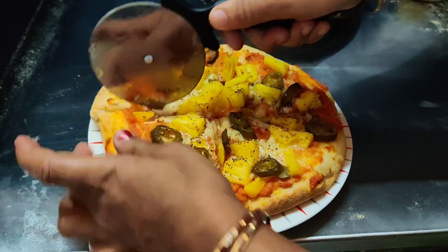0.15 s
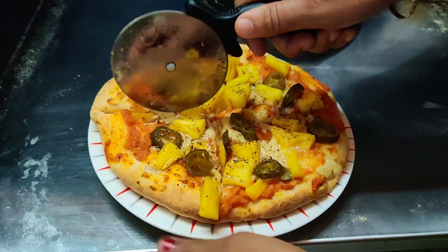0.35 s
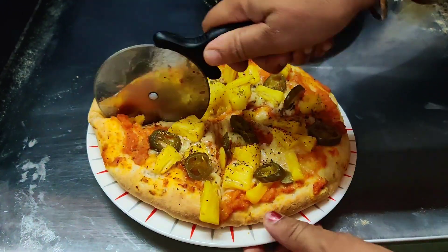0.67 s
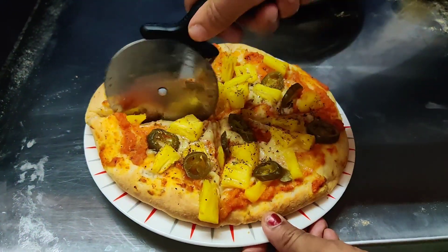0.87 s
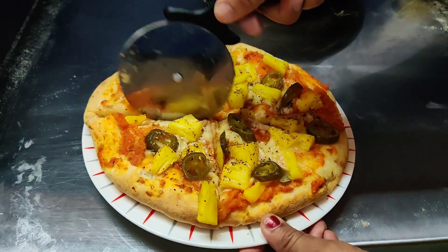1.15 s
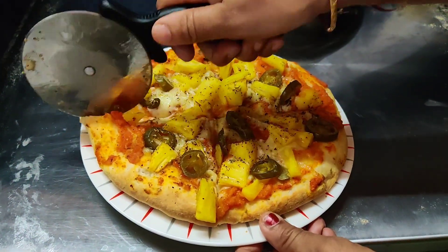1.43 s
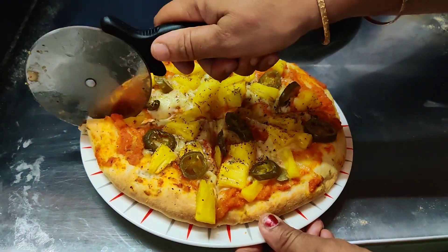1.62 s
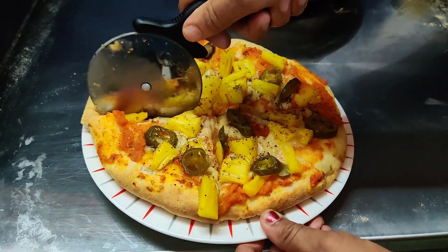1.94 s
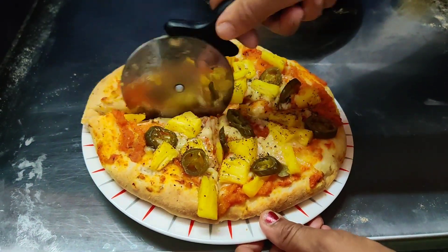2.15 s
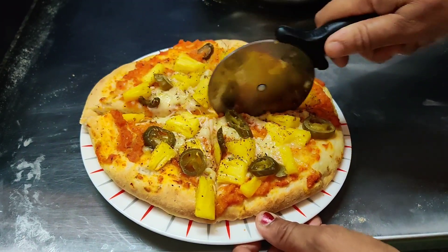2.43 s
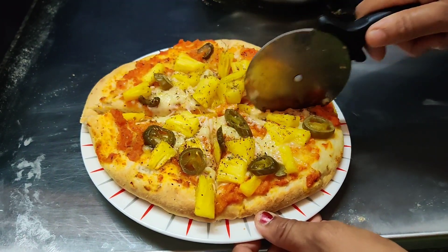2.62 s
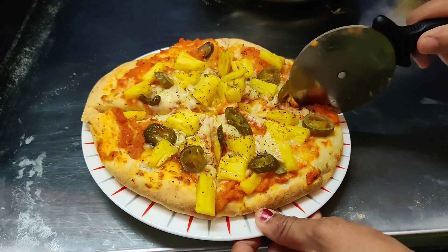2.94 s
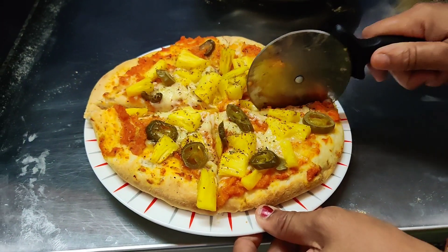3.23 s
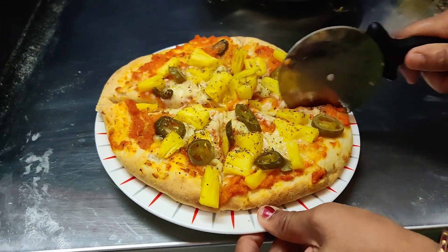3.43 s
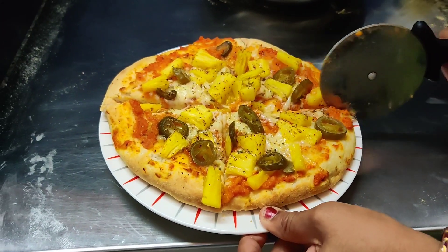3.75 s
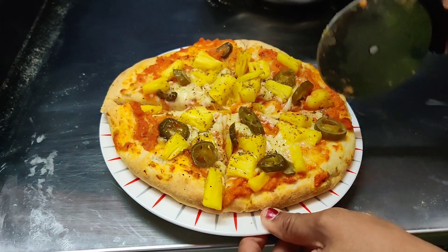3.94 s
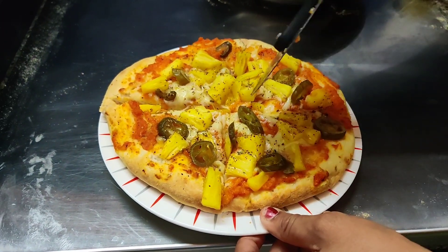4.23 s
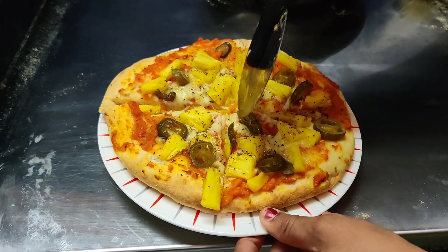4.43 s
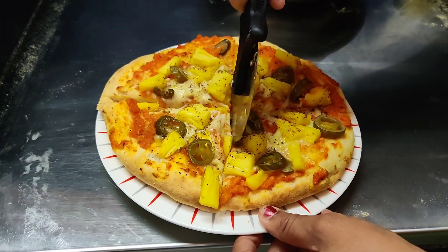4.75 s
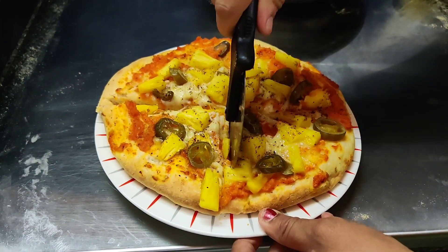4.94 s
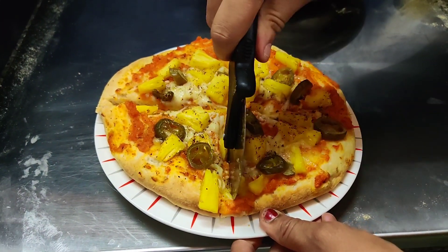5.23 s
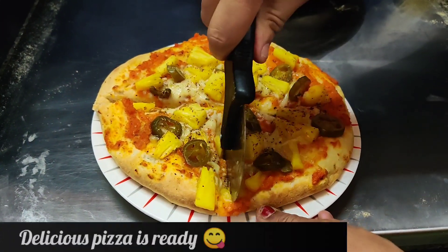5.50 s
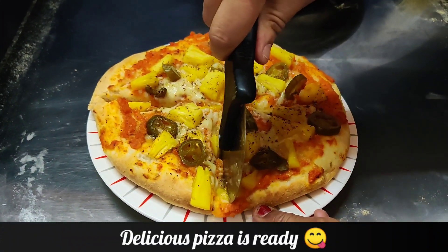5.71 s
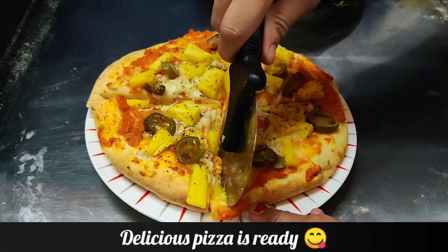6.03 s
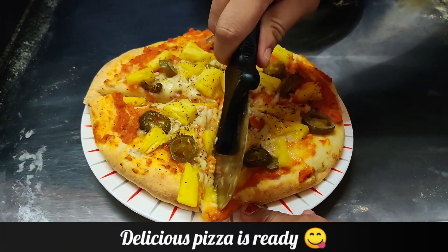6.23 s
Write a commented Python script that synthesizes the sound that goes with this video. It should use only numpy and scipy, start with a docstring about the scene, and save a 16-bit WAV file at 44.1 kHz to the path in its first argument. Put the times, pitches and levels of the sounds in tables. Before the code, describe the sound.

A cutting wheel crunches lightly through crisp pizza crust, knocking a ceramic plate with sharp clacks and a brief scrape in a humming, echoing kitchen.

```python
"""Cutting a pizza on a plate

A steel cutting wheel works through a pizza crust and knocks on the plate below, close to a stereo microphone.
Knocks are sums of decaying plate modes; crumbs snap as filtered noise bursts and crackle as sparse clicks.
The plate drags on the counter, the wheel skids on the glaze, and the hard kitchen echoes them by random taps.
A fan hums as wandering tones in room noise, under two insects of narrow-band noise and a small chirping bird.
"""
import sys
import numpy as np
from scipy import signal
from scipy.fft import rfft, irfft
from scipy.io import wavfile
from scipy.ndimage import uniform_filter1d, minimum_filter1d

SR = 44100
rng = np.random.default_rng(int(sys.argv[2]) if len(sys.argv) > 2 else 0)


def log_audio(samples):
    """Write samples as a 16-bit WAV file to the path given in sys.argv[1]."""
    # one column per channel
    frames = np.atleast_2d(samples).T
    # limit to full scale, then quantise
    limited = np.clip(frames, -1, 1)
    pcm = np.round(limited * 32767).astype(np.int16)
    wavfile.write(sys.argv[1], SR, pcm)


def nominal_scale(level):
    """Amplitude ratio for a level in decibels (scalar or array-like)."""
    x = np.asarray(level, float) / 20
    return 10 ** x


N = 280917

# crust giving way under the wheel; the 19 ms row is one sharp bright tick:
# start_s, length_s, crackle_db, rise (share of the length)
CRUST_STROKES = [(0.212, 0.15, -79.5, .8), (0.639, 0.019, -61, 0.24), (1.04, 0.081, -75, .15),
                 (1.184, 0.21, -87, 0.89), (1.548, 0.12, -76.5, 0.16), (1.693, 0.373, -77, 0.047),
                 (1.834, 0.059, -76.5, 0.69), (2.08, .42, -78, .3), (2.68, .11, -79.5, 0.62),
                 (3.27, 0.091, -76.5, .2), (3.41, 0.21, -72.5, 0.313), (3.59, 0.16, -77.5, .1),
                 (3.99, .05, -93.5, .5), (4.286, 0.071, -84.5, 0.43), (4.755, 0.17, -81.5, 0.24),
                 (4.9, .14, -86.5, .5), (5.08, 0.066, -83.5, .6), (5.49, .05, -92.5, .5),
                 (5.56, .21, -79, .3), (5.99, .13, -83.5, .45), (6.23, .11, -77.5, 0.64)]


def evened(x):
    """Power normalisation: scales to rms 1."""
    return x / np.sqrt(np.mean(x ** 2) + 1e-20)


def read(points, hz):
    """Spectral interpolation: value of a table on a log-frequency axis."""
    f, value = np.transpose(points)
    return np.interp(np.log(hz + 1), np.log(f + 1), value)


def add(mix, start_s, sound):
    """Superposition: mixes a sound in at a given time."""
    part = mix[..., round(start_s * SR):][..., :sound.shape[-1]]
    part += sound[..., :part.shape[-1]]


def coloured(x, gain):
    """Linear filtering: multiplies the spectrum by a gain that is a function of Hz."""
    hz = np.fft.rfftfreq(x.shape[-1], 1 / SR)
    return irfft(rfft(x) * gain(hz), x.shape[-1])


def peak(hz, centre_hz, width_hz):
    """Resonance: gain of one smooth band, 1 at its centre."""
    return 1 / np.sqrt(1 + (2 * (hz - centre_hz) / width_hz) ** 4)


def envelope(rows, ends_db):
    """Amplitude modulation: each row runs from a start level through its own to an end level."""
    out = np.zeros(N)
    for start_s, length_s, level_db, rise in rows:
        u = np.arange(0, 1, 1 / (length_s * SR))
        shape_db = np.interp(u, [0, np.clip(rise, .01, .99), 1], [ends_db[0], 0, ends_db[1]])
        tapered = nominal_scale(level_db + shape_db) * signal.windows.tukey(len(u), .2)
        add(out, start_s, tapered)
    return out


def grains(per_s, spread_db, wide):
    """Shot noise: sparse clicks of random sign in two channels; a few are large."""
    present = rng.random(N) < per_s / SR
    size = nominal_scale(spread_db * np.minimum(rng.exponential(1, N), 4)) * present
    near, far = size * rng.standard_normal((2, N))
    return np.array([near + wide * far, near - wide * far])


def air():
    """Partly coherent noise: room noise and hums, near mono in the bass, unrelated in the treble."""
    # spectrum of the room noise: frequency_hz, density_db (per Hz, relative)
    noise_spectrum = [(12, -32), (20, -2), (54, -7.5), (184, -5), (315, -10), (446, -15.5), (804, -16),
                      (1270, -21.5), (2610, -23.5), (4110, -33.5), (5100, -30.5), (6660, -44.5),
                      (8470, -37.5), (9430, -54), (12000, -71), (15600, -99), (22000, -120)]
    # coherence of the two channels: frequency_hz, likeness (-1 to 1)
    likeness = [(60, 0.57), (150, 1), (380, 0.74), (950, -0.19), (2380, -0.3), (5980, 0.11), (15000, -0.03)]
    # balance: frequency_hz, left_minus_right_db
    balance = [(60, 3.5), (240, -1), (950, 2.0), (3770, 4), (15000, -5.5)]
    # narrow steady bands, the highest a far insect: centre_hz, width_hz, rms_db
    steady_bands = [(320.5, 34, -73.5), (2510, 230, -90.5), (5000, 460, -92.5), (8500, 500, -84)]
    hz = np.fft.rfftfreq(N, 1 / SR)
    left, other = rfft(rng.standard_normal((2, N)))
    same = np.clip(read(likeness, hz), -1, 1)
    right = same * left + np.sqrt(1 - same ** 2) * other
    pair = np.array([left, right]) * nominal_scale(np.outer([.5, -.5], read(balance, hz)))
    out = nominal_scale(-60.5) * evened(irfft(pair * nominal_scale(read(noise_spectrum, hz)), N))
    for centre_hz, width_hz, rms_db in steady_bands:
        out += nominal_scale(rms_db) * evened(irfft(pair * peak(hz, centre_hz, width_hz), N))
    return out


def slow_noise(row):
    """Low-pass noise: two running means leave a slow random drift of rms 1."""
    return evened(uniform_filter1d(uniform_filter1d(row, size=2500), size=2500))


def fan():
    """Frequency modulation: tones of the fan, each wandering in pitch and a little in strength."""
    # tones: frequency_hz, wander_hz (rms), level_db (mean amplitude level of the two channels)
    tones = [(49, 2, -74), (98.3, 4, -65), (127.5, 1.2, -66), (185.2, 4.5, -63)]
    phase_rad, side_db = np.array([[.15], [-.15]]), [[1.2], [-1.2]]  # left leads and is louder
    out = np.zeros((2, N))
    for hz, wander_hz, level_db in tones:
        drift, swell = (slow_noise(row) for row in rng.standard_normal((2, N)))
        turns = np.cumsum(hz + wander_hz * drift) / SR + rng.random()
        out += nominal_scale(level_db + 2.8 * swell) * np.sin(2 * np.pi * turns + phase_rad) * nominal_scale(side_db)
    return out


def insect():
    """Narrow-band noise: a nearer insect's fuzzy whistle starts quickly and sinks through each chirp."""
    # chirps: start_s, level_db (reached at 0.3 of the length)
    chirps = [(.05, -76), (.64, -75.5), (1.176, -76.5), (1.768, -84), (2.381, -76), (3.094, -78.5),
              (3.868, -76), (4.6, -76), (5.1, -82), (5.71, -76.5)]
    # chirp level at its start and end, relative to level_db: start_db, end_db
    chirp_ends = (2.5, -6.5)
    noise = rng.standard_normal((2, N))
    whistle = evened(coloured(noise, lambda f: peak(f, centre_hz=10700, width_hz=300)))
    rows = [(start_s, 0.2, level_db, 0.3) for start_s, level_db in chirps]
    return whistle * envelope(rows, chirp_ends)


def bird():
    """Frequency glide: a small bird outside gives quick, scratchy rising chirps."""
    # chirps: start_s, level_db
    peeps = [(.055, -69), (1.311, -62.5), (4.23, -70), (4.3, -65.5), (4.8, -68), (5.795, -65), (6.03, -74),
             (6.265, -73)]
    end_hz, length_s = 5000, 0.028  # the glide approaches end_hz
    t, out = np.arange(round(length_s * SR)) / SR, np.zeros(N)
    for start_s, level_db in peeps:
        glide = 1 - .32 * np.exp(-t / .012)
        scratch = 1 + .06 * evened(uniform_filter1d(rng.standard_normal(len(t)), size=40))
        turns = np.cumsum(end_hz * glide * scratch) / SR
        add(out, start_s, nominal_scale(level_db) * np.sin(2 * np.pi * turns) * np.hanning(len(t)))
    return np.array([out, out])


def kitchen(x):
    """Reverberation: sparse taps of random sign, each band dying at its own speed, other taps for each ear."""
    # decay of the echo: frequency_hz, t60_s
    decay = [(250, .6), (700, .6), (2000, 0.52), (5000, 0.61), (9000, 0.5), (15000, 0.54)]
    # colour of the echo: frequency_hz, gain_db
    colour = [(200, 5.5), (700, 2.5), (2000, 4), (5000, -5.5), (7000, -2.5), (12000, -3.5)]
    taps = np.zeros((2, SR))
    at = np.arange(160, SR - 20, 20) + rng.integers(0, 20, (2, (SR - 161) // 20))
    np.put_along_axis(taps, at, rng.choice([-1., 1.], at.shape), 1)
    hz, t, z = signal.stft(taps, SR, nperseg=256)
    same = 1 / (1 + (hz[:, None] / 450) ** 2)  # long waves reach both openings alike
    z[1] = same * z[0] + np.sqrt(1 - same ** 2) * z[1]
    tail_db = read(colour, hz)[:, None] - 60 * t / read(decay, hz)[:, None]
    tail = signal.istft(z * nominal_scale(tail_db), SR, nperseg=256)[1]
    return signal.fftconvolve(x, tail / np.linalg.norm(tail[0]), axes=1)[:, :N]


def ports(x):
    """Interaural-like differences: the microphone's two openings hear with their own colour and phase."""
    # openings: frequency_hz, left_minus_right_db, left_lead_rad
    openings = [(0, 0.5, 0.84), (499.06, 1, 0.65), (1190, 3.5, 1.6), (2200, 0.5, 0.91), (3100, 1, 1.9),
                (4100, 2.5, 1.5), (5000, 12, 0.14), (5600, 3.5, 0.62), (6250, -9, 1.7), (7100, -8, 0.19),
                (8500, 2.5, 1.4), (9300, -5.5, 0.6), (12500, 0, 0.076)]
    hz, lean_db, lead_rad = np.transpose(openings)
    side = np.array([[.5], [-.5]])

    def response(f):
        return nominal_scale(side * np.interp(f, hz, lean_db)) * np.exp(1j * side * np.interp(f, hz, lead_rad))
    return coloured(x, response)


def drag():
    """Stick-slip friction: clicks of the plate's foot, rung through the counter's resonances."""
    # plate dragging on the counter: start_s, length_s, level_db, rise (share of the length)
    slides = [(.284, .07, -52.5, 0.055), (.66, .1, -50, 0.028), (1.74, 0.18, -63, .6),
              (1.925, 0.08, -36, 0.12), (1.995, 0.075, -34, 0.12), (2.052, .25, -41, 0.025),
              (2.526, .12, -43, 0.048), (3.403, 0.077, -50, .05), (4.79, 0.045, -74, .3),
              (4.955, .04, -65.5, .4), (5.075, .04, -63.5, .35), (5.6, 0.13, -61, .35),
              (6.26, 0.092, -69.5, 0.49)]
    # resonances of the counter: centre_hz, width_hz, gain_db
    resonances = [(230, 80, -7.5), (380, 180, -7.5), (550, 48, -8), (718.4, 120, -2), (847.5, 210, -7),
                  (1400, 260, -15), (2000, 370, -8)]
    # level at both ends of a slide, relative to level_db: start_db, end_db
    slide_ends = (-12.5, -27)

    def body(f):
        return sum(nominal_scale(gain_db) * peak(f, hz, width_hz) for hz, width_hz, gain_db in resonances)
    slips = grains(per_s=3300, spread_db=2.5, wide=0.25)
    return evened(coloured(slips, body)) * envelope(slides, slide_ends)


def scrape():
    """Forced modal vibration: the steel edge skids on the glaze in dense tiny blows to the upper modes."""
    # wheel skidding on the glaze: start_s, length_s, level_db, rise (share of the length)
    skids = [(1.99, 0.082, -38, .4), (2.08, 0.22, -51.5, .1), (3.592, .045, -46.5, 0.29),
             (5.58, 0.1615, -67.5, 0.26)]
    # level at both ends of a skid, relative to level_db: start_db, end_db
    skid_ends = (-13.5, -14)
    blows = grains(per_s=4000, spread_db=2.2, wide=.6)
    ring = knock("far rim", 0, 3.4, damping=2.2)
    skidding = signal.oaconvolve(blows, ring[None], axes=1)[:, :N]
    return evened(skidding) * envelope(skids, skid_ends)


def crackle():
    """Brittle fracture as shot noise: many tiny breaks of the crust, bright and dense."""
    # spectrum of the fractures: frequency_hz, gain_db
    fracture_spectrum = [(1410, -32.5), (2400, -4.5), (3070, -10), (4980, -2.5), (6220, -12), (11700, -13),
                         (12900, -14), (14300, -9.5), (16000, -27.5)]
    # level at both ends of a stroke, relative to crackle_db: start_db, end_db
    stroke_ends = (-10, -18.5)
    clicks = grains(per_s=6000, spread_db=2.0, wide=0.74)
    fine = coloured(clicks, lambda f: nominal_scale(read(fracture_spectrum, f)))
    # the stroke levels refer to this treble band, both channels averaged
    top = coloured(fine, lambda f: (f > 11400) & (f < 15500))
    return fine / np.std(top.mean(0)) * envelope(CRUST_STROKES, stroke_ends)


def faint(top_db):
    """Random point process: rows of faint snaps, about 10 a second, scattered over the strokes."""
    # the two pitches of faint snaps: low_hz, high_hz
    snap_hz = (2030, 5000)
    rows = []
    for start_s, length_s, *_ in CRUST_STROKES:
        for chance, at, size, pitch in rng.random((4, 4)):  # four candidates a stroke
            if chance < 10 * length_s / 4:
                rows.append((start_s + length_s * at, top_db - 8 * size, snap_hz[int(pitch > .4)]))
    return rows


def ticks():
    """Impulsive excitation: each snap or crack is a brief noise burst, partly gathered around its own pitch."""
    # crumbs and flakes snapping, and the bright crack of the 5.2 s knock:
    # start_s, level_db (nominal peak), centre_hz
    single_ticks = [(0.1785, -56, 2300), (0.2319, -56, 4700), (0.56, -50.5, 4470), (0.594, -55, 4870),
                    (0.623, -53, 5060), (0.957, -57, 6800), (1.0667, -49, 4630), (1.104, -49, 5000),
                    (1.5742, -51, 5200), (1.636, -50.5, 5000), (1.6913, -43, 4830), (1.7011, -50, 4900),
                    (2.719, -50, 2350), (3.6475, -38.5, 4783), (4.0246, -50, 2046), (4.8567, -52.5, 5480),
                    (4.9697, -53.5, 1986), (5.0894, -56.5, 4960), (5.203, -26.5, 4660),
                    (5.6103, -49.5, 2140), (6.124, -53, 4900), (6.2737, -52.5, 4770)]
    faint_db = -57
    out, t = np.zeros((2, N + 1024)), np.arange(-256, 768) / SR
    decay = nominal_scale(-60 * abs(t) / np.where(t < 0, .003, .018))  # 60 dB up in 3 ms, down in 18 ms
    for start_s, level_db, hz in single_ticks + faint(faint_db):
        broad_db = -15 + 0.36 * (level_db - faint_db)  # harder ticks are broader
        top_hz = np.clip(8995 + 700 * (level_db + 55), 7000, 17000)  # and reach higher
        burst = rng.standard_normal((2, 1024)) * decay
        burst = burst + .7 * burst[::-1]  # the channels share part of the noise

        def gain(f):
            return peak(f, hz, 1000) + nominal_scale(broad_db) * peak(f, top_hz / 2, top_hz - 1500)
        burst = coloured(burst, gain)
        onset_rms = burst[:, 256:356].std()
        add(out, start_s + t[0], nominal_scale(level_db - 9) * burst / onset_rms)
    return out[:, :N]


def knock(place, level_db, tilt_db, damping=1):
    """Modal synthesis: the plate's modes, set off by a contact that builds up over 0.74 ms."""
    # where the plate is struck, in the order of the last columns of the modes
    places = ["far rim", "near rim", "middle", "well", "dough"]
    # modes of the plate: frequency_hz, t60_s (at damping 1), then level_db (before tilt) at each place
    modes = [(419, 0.023, -21.5, -12, -17, -9.5, -7), (720, 0.023, -9, -15, -9.5, -15.5, -17.5),
             (913, 0.012, -15.5, -29, -9, -8.5, -2.5), (1057, 0.016, -12, -7, -10.5, -6, 0),
             (1384, 0.0095, -14.5, -26, -0.5, 4.5, 9), (1784, 0.017, -6, -2.5, -5, -4, -1),
             (2276, .02, -16.5, -25, -12, -2.5, 3), (2623, 0.016, -7.5, -3, -7.5, -14, -3),
             (3182, 0.022, -6, -7.5, -11.5, -5, -12.5), (3460, 0.01, 3.5, 7, -10, -15, 3),
             (3816, .014, -15.5, -5.5, -9, -15, 2.5), (4547, 0.011, 1.5, 4, -4.5, 1.5, -33),
             (4980, 0.011, -2.5, -10.5, -7.5, -3, 8), (5384.6, 0.015, -9, -4.5, -8.5, -8, 0),
             (6280, 0.016, -30, -37.5, -28.5, -21.5, -10), (6856, 0.015, -10.5, -15.5, -24, -38, -33),
             (6940, 0.017, -32.5, -35.5, -36.5, -46.5, -14), (8140, 0.013, -28, -22.5, -25.5, -21, -12),
             (8900, 0.0079, -36.5, -32.5, -21, -27, -16), (9770, 0.027, -30, -34, -43, -49, -28.5),
             (10300, 0.023, -42.5, -39.5, -38, -39.5, -22.5),
             (11100, 0.0086, -43, -41.5, -33.5, -30.5, -43), (13200, .01, -41.5, -44, -33, -33.5, -27)]
    t, out = np.arange(3000) / SR, np.zeros(3000)
    for k, (hz, t60, *place_db) in enumerate(modes):
        mode_db = place_db[places.index(place)] + tilt_db * np.log2(hz / 2000)
        # neighbouring modes start in opposite directions
        turns = hz * t + k / 2 + 0.36 * rng.random()
        out += nominal_scale(mode_db - 60 * damping * t / t60) * np.sin(2 * np.pi * turns)
    return nominal_scale(level_db) * out * np.minimum(t / 0.00074, 1) ** 2


def knocks():
    """Impact and radiation: the wheel meets the plate; returns the direct sound and the room send."""
    # blows: start_s, place, level_db, tilt_db (per octave), send_db (before a common lift of 6 dB)
    blows = [(0.2839, "middle", -37.5, -2.5, -11.5), (0.6585, "dough", -29, 1, -5),
             (1.9071, "far rim", -6.5, 1.5, -10), (2.0533, "middle", -11, 1, -7.5),
             (2.524, "well", -17.5, 2.5, -3.5), (3.225, "near rim", -9, 1.5, -9),
             (3.4037, "middle", -29.5, -1, -7), (5.202, "middle", -34.5, -4, -11)]
    direct, send = np.zeros((2, 2, N))
    for start_s, *blow, send_db in blows:
        add(direct, start_s - .0006, knock(*blow))
        # the walls hear the plate from all sides, which blurs its modes
        add(send, start_s - .0006, nominal_scale(send_db + 6) * knock(*blow, damping=1.975))
    return direct, send


def scene():
    """Superposition of close sounds, their echo in the kitchen, and the background."""
    crumbs, close, peeps = crackle(), ticks() + drag() + scrape(), bird()
    direct, knock_send = knocks()
    send = nominal_scale(1.0) * crumbs + nominal_scale(-6.0) * close + nominal_scale(1.5) * peeps + knock_send
    heard = ports(close + direct + crumbs + peeps + kitchen(send))
    return heard + air() + fan() + insect()


def gate(x, floor_db=-106, from_hz=3600):
    """Spectral gating: treble bands under a fixed level are turned down, by up to 25 dB, while they stay there."""
    hz, _, z = signal.stft(x, SR, nperseg=1024)
    bins = abs(z[:, :512]) ** 2
    power = bins.mean(0).reshape(64, 8, -1).mean(1)  # 64 bands of 8 bins
    level_db = 10 * np.log10(uniform_filter1d(power, size=7, axis=1) + 1e-20)
    under_db = floor_db - np.repeat(level_db, 8, axis=0)
    shut = np.clip(under_db / 1.5, 0, 1) * (hz[:512, None] > from_hz)
    z = np.concatenate([z[:, :512] * nominal_scale(-25 * shut), z[:, 512:]], axis=1)
    return signal.istft(z, SR, nperseg=1024)[1][:, :N]


def limit(x, ceiling=.86):
    """Peak limiting: a fast gain holds the loudest knocks under the ceiling, both channels together."""
    gain = np.minimum(ceiling / (abs(x).max(0) + 1e-9), 1)
    gain = minimum_filter1d(gain, size=41)
    return x * uniform_filter1d(gain, size=41)


def top_cut(x):
    """Nothing passes above the cut-off."""
    return signal.sosfilt(signal.butter(12, 16600, fs=SR, output="sos"), x)


def record(dry):
    """Band limitation: the quiet treble is gated, peaks are limited, and a low-pass cuts at 16450 Hz."""
    limited = limit(gate(dry))
    low_pass = signal.firwin(255, 16450, fs=SR)
    mix = signal.oaconvolve(limited, low_pass[None], "same", axes=1)
    return top_cut(mix)


dry = scene()
out = record(dry)
log_audio(out)
```